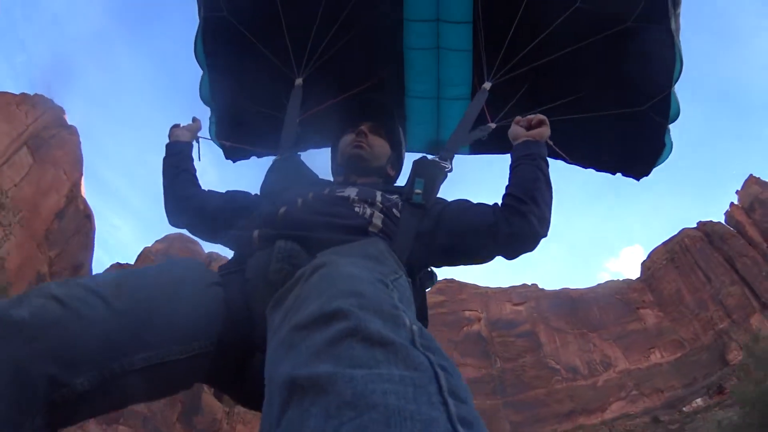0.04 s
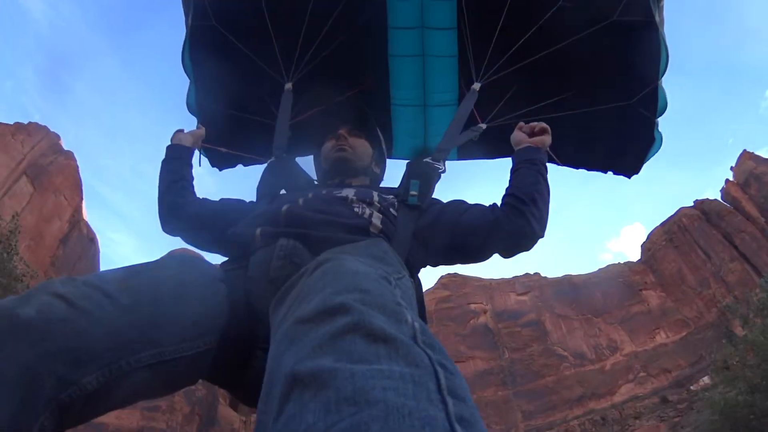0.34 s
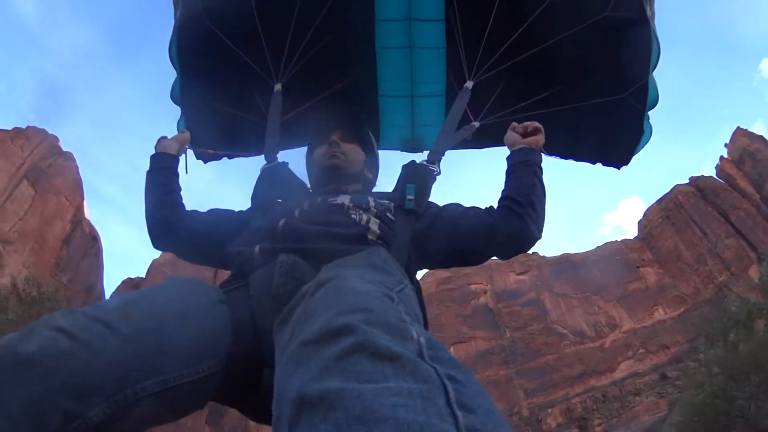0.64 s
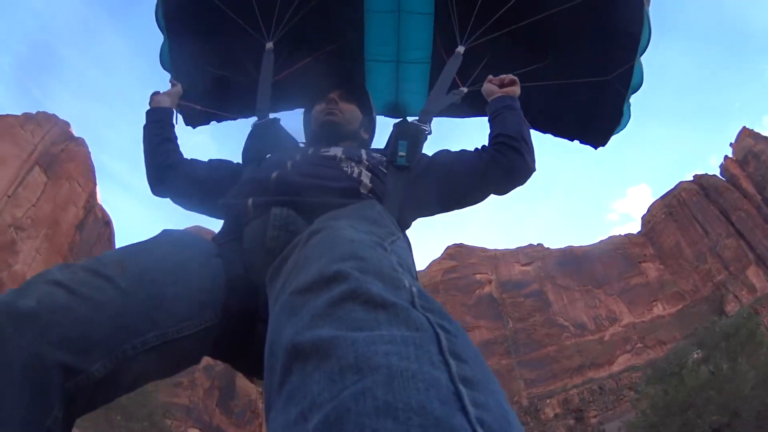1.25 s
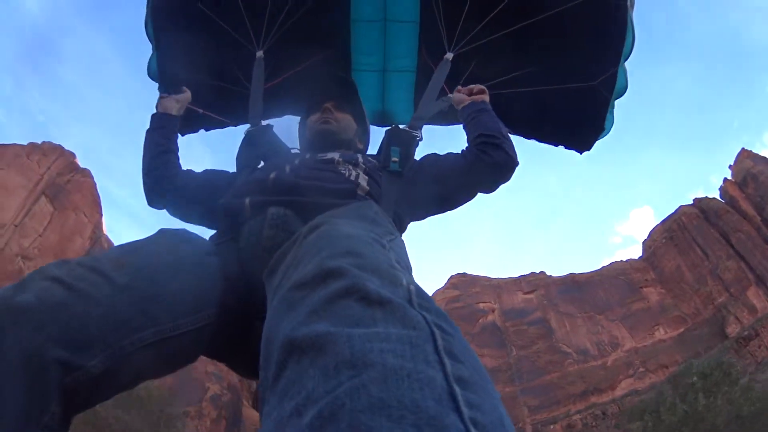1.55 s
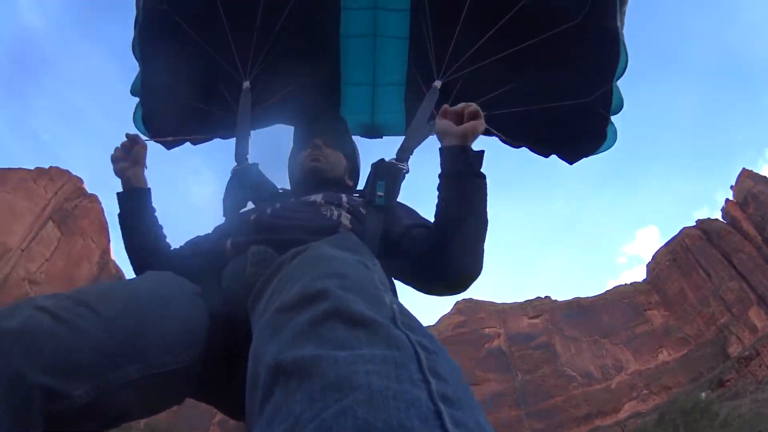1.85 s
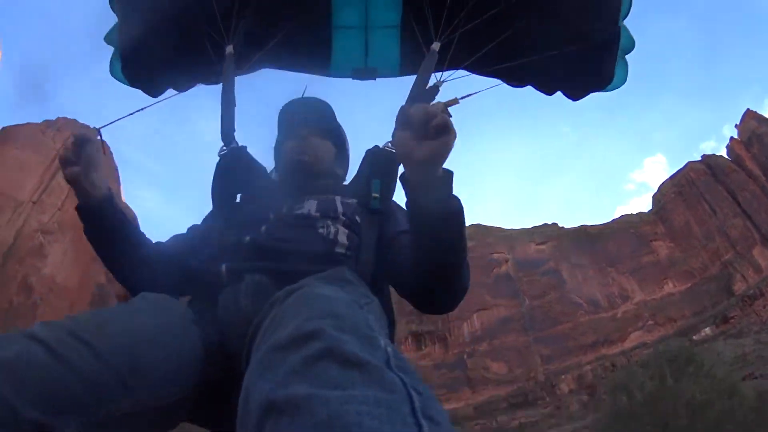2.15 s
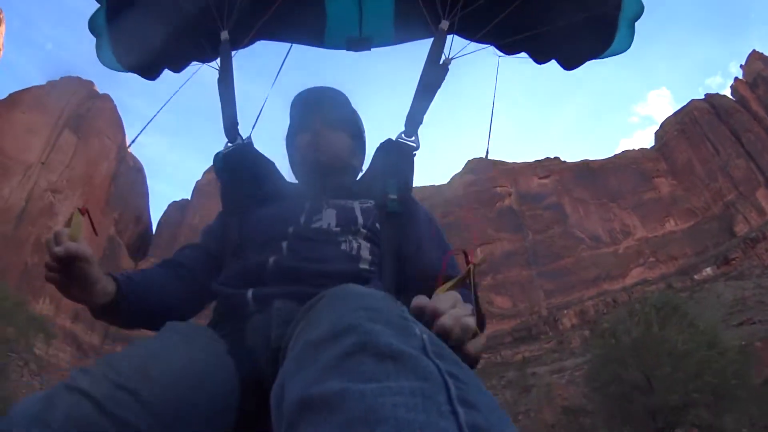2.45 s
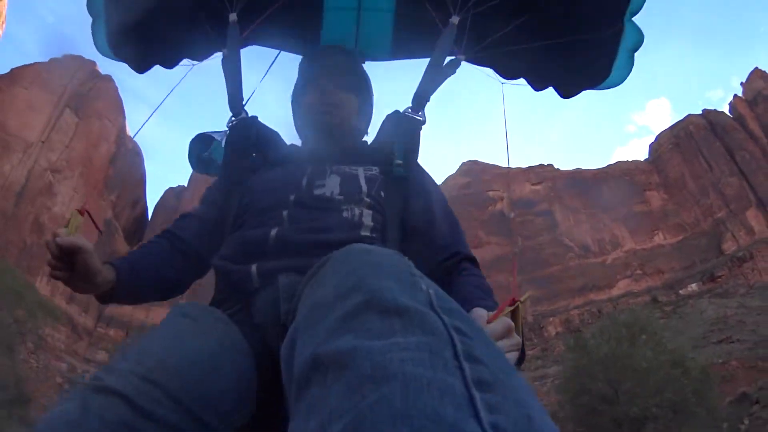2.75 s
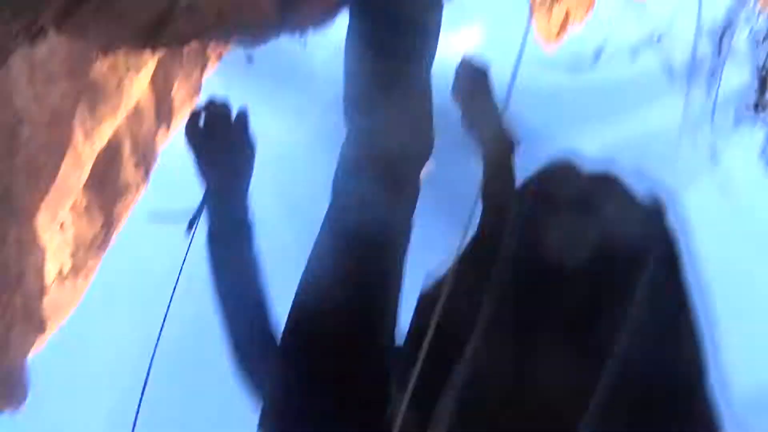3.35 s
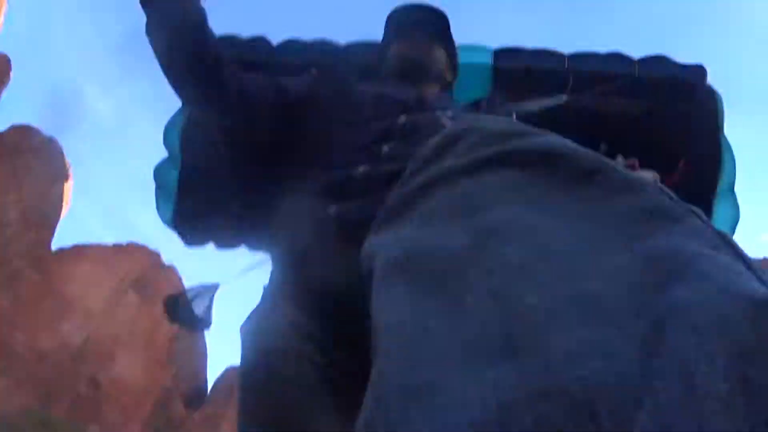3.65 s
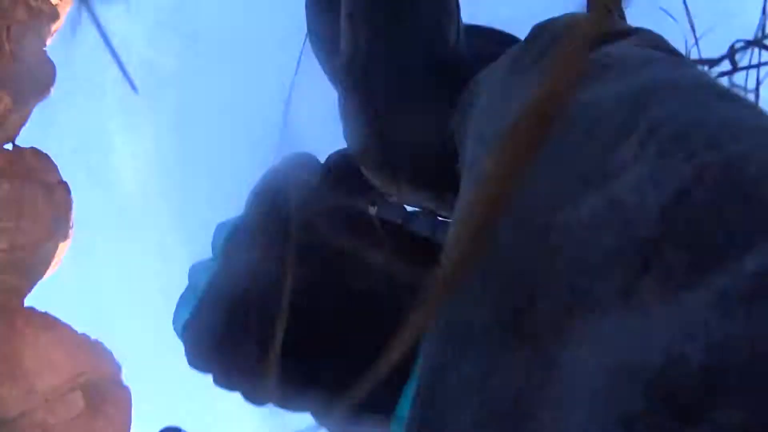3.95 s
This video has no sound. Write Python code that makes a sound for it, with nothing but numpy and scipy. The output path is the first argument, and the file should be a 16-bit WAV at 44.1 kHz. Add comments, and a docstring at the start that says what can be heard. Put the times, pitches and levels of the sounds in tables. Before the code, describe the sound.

Wind rumbles and buffets the microphone during a parachute glide, strongest at first and easing after about 1 second, with more gusts from 2 seconds. A thump comes near 2.7 seconds. From about 3 seconds the feet land with dull jolts, shoes scuff and tick in grit, and cloth rubs with brief squeaks as the wind drops. A cluster of hard knocks hits the microphone just before 4 seconds.

```python
"""Wind roars and buffets at the two microphone ports of a small camera on a parachutist's foot.
It eases as the canopy slows; harness cloth rustles and the lines sing faintly in the airflow.
Then the feet touch down: jolts thump, shoes scuff through grit, cloth rubs and squeaks on the
housing, and knocks rattle the camera and ring its shell."""
import sys
import numpy as np
from scipy import signal
from scipy.fft import rfft, irfft
from scipy.io import wavfile

SR = 44100
rng = np.random.default_rng(int(sys.argv[2]) if len(sys.argv) > 2 else 0)


def materialize(psi):
    """Save the field psi as 16-bit PCM at rate SR to the path in sys.argv[1].

    A 1-D psi becomes a single channel; in a 2-D psi each row is a channel.
    """
    bounded = np.clip(np.atleast_2d(psi).T, -1, 1)
    quanta = np.round(bounded * 32767).astype(np.int16)
    wavfile.write(sys.argv[1], SR, quanta)


N = 176400
T = np.arange(N) / SR
HZ = np.fft.rfftfreq(N, 1 / SR)

# turbulence (time [s], rumble [dB], buffet [dB], roar [dB]), before trim
EDDY_LEVELS = [(0.0, -40, -11.5, -19), (0.1, -22, -46, -14), (0.2, -33.5, -19, -19),
               (0.48, -24.5, -22.5, -16.5), (0.62, -36, -17.5, -18.5), (0.7, -29, -17.5, -20),
               (0.9, -33.5, -16, -20.5), (1.2, -28, -18, -23.0), (1.42, -29.5, -21.5, -26.5),
               (1.7, -31, -21, -28.5), (1.97, -25.5, -24.5, -26.5), (2.12, -39, -16.5, -19.5),
               (2.3, -26.5, -19.5, -26), (2.65, -25, -25, -28.5), (2.77, -28.5, -21.5, -20),
               (2.92, -20.5, -22.5, -21), (3.12, -25.5, -19.5, -21.5), (3.27, -18.5, -26, -21),
               (3.33, -38.5, -43, -60), (3.6, -41, -60, -30), (3.72, -42, -38, -32.5),
               (3.81, -48, -39, -44), (3.9, -23, -23, -41), (4, -42, -41.5, -54)]
# smoother flow (time [s], rush [dB], hiss [dB]), before trim
STREAM_LEVELS = [(0, -30, -53), (.14, -30, -51), (.34, -30.5, -58.5), (.47, -30, -55), (.63, -31, -50),
                 (.68, -37, -52), (.85, -34, -57.5), (1.05, -38, -60), (1.6, -39, -57), (2.5, -37.5, -53.5),
                 (2.68, -38.5, -55), (2.81, -40, -60), (2.97, -38.5, -49.5), (3.3, -29, -44.5),
                 (3.4, -35.5, -41.5), (3.58, -40, -54), (3.75, -40, -52.5), (3.8, -42, -57),
                 (3.95, -39, -55)]
# spectra (frequency [Hz], relative density [dB])
RUMBLE_SPECTRUM = [(15, -20.5), (35, -12), (70, -2.5), (110, -0.5), (160, -1.5), (300, -23.5), (1000, -51),
                   (3000, -76)]
BUFFET_SPECTRUM = [(50, -24), (110, -10), (165, 0), (210, 0.5), (280, -0.5), (370, -9), (600, -35),
                   (1500, -59.5), (4000, -82)]
ROAR_SPECTRUM = [(80, -24), (210, -14), (320, -3.5), (440, -3), (650, -8.5), (900, -14), (1300, -25.5),
                 (2500, -41), (8000, -86)]
RUSH_SPECTRUM = [(150, -7), (500, -2.5), (800, -2), (1150, 0), (1700, -8), (2500, -16.5), (4000, -28),
                 (5600, -31), (9000, -41)]
HISS_SPECTRUM = [(300, -6), (2000, 2.5), (3300, 3), (4700, 5), (5700, -3), (7300, 0), (9000, -1.5),
                 (10800, 2.5)]

def wind():
    """Large eddies rumble and buffet, small ones roar; smoother air adds a rush and a thin hiss."""
    rumble = airflow(RUMBLE_SPECTRUM, flutter_db=-2.5, flutter_hz=4.4)
    buffet = airflow(BUFFET_SPECTRUM, flutter_db=0.5, flutter_hz=24.8)
    roar = airflow(ROAR_SPECTRUM, flutter_db=1.7, flutter_hz=68)
    rush = airflow(RUSH_SPECTRUM, flutter_db=1.7, flutter_hz=140)
    hiss = airflow(HISS_SPECTRUM, flutter_db=1.5, flutter_hz=50)
    return (rumble * level(EDDY_LEVELS, column=1, trim_db=2.5)
            + buffet * level(EDDY_LEVELS, column=2, trim_db=-0.4)
            + roar * level(EDDY_LEVELS, column=3, trim_db=-1)
            + rush * level(STREAM_LEVELS, column=1, trim_db=0.5)
            + hiss * level(STREAM_LEVELS, column=2, trim_db=6))


# moving air (frequency [Hz], left-right correlation)
AIR_CORRELATION = [(60, 0.89), (130, 0.87), (270, 0.39), (570, -0.2), (1210, -0.37), (2570, 0.16),
                   (5450, 0.42), (11600, 0.64)]

def airflow(spectrum, flutter_db, flutter_hz):
    """Unit-rms turbulence that flutters as eddies pass the ports."""
    eddies = ports(colour(rng.standard_normal((2, N)), spectrum), AIR_CORRELATION)
    return unit(eddies * amp(flutter_db * wander(flutter_hz)))


# gusts at the ports (start [s], length [s], level [dB])
GUST_STROKES = [(.08, 0.036, -16), (.29, 0.05, -21), (.69, 0.051, -17.5), (.84, 0.099, -22),
                (2.03, 0.11, -20.5), (2.58, 0.014, -17), (2.715, 0.12, -17)]
# (frequency [Hz], relative density [dB])
GUST_SPECTRUM = [(60, -32), (160, -4.5), (270, 2.5), (380, -1.5), (520, -9), (700, -11), (1000, -32),
                 (3000, -71)]

def gusts():
    """Hollow swells of turbulence as the foot swings into the airflow."""
    swells = strokes(GUST_STROKES, rise_s=0.01, fall_s=0.019)
    return swells * airflow(GUST_SPECTRUM, flutter_db=2.0, flutter_hz=40)


# footfalls and jolts through the leg (time [s], level [dB], pitch [Hz])
JOLTS = [(2.7, -10.5, 85.5), (3.172, -9, 68.6), (3.195, -7.5, 64), (3.286, -8.5, 43), (3.421, -6, 86.5),
         (3.847, -9, 90), (3.872, -6.5, 129), (3.895, -12, 77), (3.922, -10, 121), (3.942, -13.5, 185)]

def thumps(rise_s=0.005, left_lag_s=0.001, puff_db=-9):
    """Each jolt pushes a damped low swing of air and a rough puff into one port, then the other."""
    out = np.zeros((2, N))
    samples = 6000
    t = np.maximum(T[:samples] - np.array([[left_lag_s], [0]]), 0)
    swell = (t / rise_s * np.exp(1 - t / rise_s)) ** 2.5
    rough_air = airflow(ROAR_SPECTRUM, flutter_db=5.5, flutter_hz=152)
    for k, (s, db, hz) in enumerate(JOLTS):
        puff = amp(puff_db) * np.roll(rough_air, k * samples, axis=1)[:, :samples]
        add(out, s, amp(db) * swell * (puff - np.sin(2 * np.pi * hz * t)))
    return out


# knocks on camera and strap (time [s], level [dB], pitch [Hz]); harder is higher
CAMERA_KNOCKS = [(3.128, -4.5, 900), (3.2065, -10.5, 1450), (3.2119, -8, 1700), (3.254, -18, 1600),
                 (3.473, -3, 1100), (3.542, -3, 1500), (3.702, -17.5, 1540), (3.8239, -17, 1380),
                 (3.8695, -15.5, 1700), (3.8797, 0.5, 1790), (3.8823, -4, 970), (3.8887, -0.5, 1140),
                 (3.9057, -6, 660)]
# (frequency [Hz], relative density [dB])
RATTLE_SPECTRUM = [(40, -21), (250, -2), (1100, 9), (2400, 6), (4000, -6), (7000, -14.5), (11000, -30)]

def knocks(decay_cycles=0.6, pitch_spread=0.15, rattle_db=-2.5, hard_hz=1500):
    """Knocks flex the camera mount for about a cycle; hard ones rattle it."""
    flex, rattle = np.zeros((2, 2, N))
    for s, db, hz in CAMERA_KNOCKS:
        cycles = hz * T[:2000] * np.exp(pitch_spread * rng.standard_normal((2, 1)))
        add(flex, s, amp(db) * np.sin(2 * np.pi * cycles) * np.exp(-cycles / decay_cycles))
        add(rattle, s, amp(db + rattle_db) * (hz / hard_hz) ** 2 * burst(decay_s=0.0022))
    return flex + colour(rattle, RATTLE_SPECTRUM)


# cloth on the housing (start [s], length [s], level [dB])
RUB_STROKES = [(3.095, 0.037, -16.5), (3.203, 0.069, -21.5), (3.302, 0.068, -28), (3.414, 0.026, -23.5),
               (3.44, 0.11, -18), (3.53, 0.046, -15), (3.575, 0.06, -15), (3.635, 0.037, -18),
               (3.697, 0.014, -35), (3.738, 0.015, -26), (3.772, 0.0075, -20)]
# (frequency [Hz], relative density [dB])
CLOTH_SPECTRUM = [(30, -7), (150, -2), (330, 2.5), (550, 0), (750, -1), (1200, -6), (1700, -16),
                  (3000, -30.5), (5000, -53), (11000, -71)]

def rubs():
    """Cloth sticks and slips on the housing with a dull rasp."""
    slips = grains(per_s=3700, spread_db=2.5) * unit(amp(1.54 * wander(rate_hz=46)))
    return colour(slips * strokes(RUB_STROKES, rise_s=0.0017, fall_s=0.0029), CLOTH_SPECTRUM)


# shoes and trouser legs in grit (start [s], length [s], level [dB])
SCUFF_STROKES = [(2.912, 0.0068, -30.5), (3.058, 0.015, -25), (3.112, 0.017, -30), (3.148, 0.033, -30.5),
                 (3.2, 0.007, -32), (3.246, 0.0095, -28), (3.301, 0.018, -19), (3.328, .038, -26.5),
                 (3.372, 0.075, -37), (3.44, 0.052, -22.5), (3.489, 0.024, -19), (3.516, 0.027, -25.5),
                 (3.735, 0.012, -36.5), (3.862, 0.083, -38)]
# (frequency [Hz], relative density [dB])
GRIT_SPECTRUM = [(60, -17), (400, 5.5), (1200, 6.5), (2200, 0.5), (3500, -4.5), (5500, -10), (7000, -6),
                 (8800, -9.5), (10500, -7)]

def scuffs():
    """Clumps of grit slip under the shoes."""
    slips = grains(per_s=3000, spread_db=4.8) * unit(amp(4.2 * wander(rate_hz=170)))
    return colour(slips * strokes(SCUFF_STROKES, rise_s=0.0026, fall_s=0.013), GRIT_SPECTRUM)


# small impacts (time [s], level [dB], leftward pan [dB])
GRIT_TICKS = [(2.378, -24, -5), (2.394, -16, -1), (2.436, -24, -7), (2.446, -19.5, 0), (2.879, -18, 17),
              (2.917, -22, 7), (3.052, -3.5, 8.5), (3.077, -11.5, 15), (3.092, -18, 9), (3.108, -12, -1),
              (3.17, -6.5, 3), (3.201, -10, -14), (3.221, -11, 0), (3.253, -12, 15), (3.302, -13, 5),
              (3.402, -17, 3), (3.462, -11, 2), (3.508, 1, -7), (3.526, -5, 0), (3.544, -1, 3),
              (3.7, -18, 0), (3.847, -14, 6), (3.9235, -8.5, -4)]
# (frequency [Hz], relative density [dB])
SNAP_SPECTRUM = [(200, -39), (1200, 7), (3300, 5), (5500, 2), (8000, 2.5), (10500, -1)]

def ticks():
    """Grit and buckles strike with sharp ticks."""
    out = np.zeros((2, N))
    for s, db, pan_db in GRIT_TICKS:
        add(out, s, amp([[db + pan_db / 2], [db - pan_db / 2]]) * burst(decay_s=0.00074))
    return colour(out, SNAP_SPECTRUM)


# cloth catching (start [s], length [s], level [dB], pitch [Hz])
SQUEAK_NOTES = [(3.327, 0.025, -30.5, 2100), (3.445, 0.046, -21, 1320), (3.543, 0.014, -16, 1180),
                (3.698, 0.011, -32, 1130), (3.74, 0.029, -27.5, 1010)]

def squeaks():
    """Slips almost in step make a short, rough note."""
    return tones(SQUEAK_NOTES, width_hz=540, rise_s=0.0017, fall_s=0.0029)


# harness and sleeves (start [s], length [s], level [dB])
RUSTLE_STROKES = [(1.135, 0.02, -49), (1.21, 0.02, -47), (1.4, 0.02, -46.5), (2.5, 0.065, -51),
                  (2.877, 0.024, -41), (3.942, .07, -38)]

def rustles():
    """Stiff fabric creases with a fine, bright crackle."""
    creases = grains(per_s=4000, spread_db=3.2)
    return colour(creases * strokes(RUSTLE_STROKES, rise_s=0.0026, fall_s=0.013), SNAP_SPECTRUM)


# suspension lines (start [s], length [s], level [dB], pitch [Hz])
LINE_NOTES = [(0, 0.47, -55, 4600), (1.92, .08, -61, 6750)]

def whistles():
    """Thin lines shed eddies at a high, fuzzy pitch."""
    return ports(tones(LINE_NOTES, width_hz=900, rise_s=0.027, fall_s=0.12), AIR_CORRELATION)


# shell resonances (frequency [Hz], level [dB], t60 [s])
SHELL_MODES = [(580, -51, 0.087), (1186, -56, 0.074), (2120, -53, 0.036), (3560, -60, 0.02),
               (6730, -40, 0.013), (9960, -26, .007), (10700, -31.5, 0.007)]
# contact sound (frequency [Hz], left-right correlation)
CONTACT_CORRELATION = [(60, 0.99), (250, 0.78), (600, -0.17), (1500, -0.14), (2500, 0.074), (4500, 0.41),
                       (10000, 0.36)]

def housing(contact):
    """Contact reaches both ports and rings the plastic shell."""
    direct = ports(contact, CONTACT_CORRELATION)
    t = T[:4000]
    ring = sum(amp(db - 60 * t / t60) * np.cos(2 * np.pi * hz * t) for hz, db, t60 in SHELL_MODES)
    return direct + signal.oaconvolve(direct, ring[None], axes=1)[:, :N]


def ports(x, correlation):
    """Two close ports: each channel leaks into the other."""
    angle = np.arcsin(np.clip(per_bin(correlation), -.99, .99)) / 2
    bins = rfft(x)
    return irfft(np.cos(angle) * bins + np.sin(angle) * bins[::-1], N)


def tones(table, width_hz, rise_s, fall_s):
    """Breathy notes: noise in a narrow resonance."""
    out = np.zeros((2, N))
    for s, length, db, hz in table:
        rolloff = (1 + (2 * (HZ - hz) / width_hz) ** 2) ** 2
        note = irfft(rfft(rng.standard_normal((2, N))) / rolloff, N)
        out += unit(note) * strokes([(s, length, db)], rise_s, fall_s)
    return out


def grains(per_s, spread_db):
    """Tiny random slips of unequal size at each port."""
    size = amp(spread_db * np.minimum(rng.exponential(1, (2, N)), 4))
    sign = rng.choice([-1, 1], (2, N))
    slipping = rng.random((2, N)) < per_s / SR
    return unit(size * sign * slipping)


def strokes(table, rise_s, fall_s):
    """Rise-hold-release envelopes, summed in power."""
    power = np.zeros(N)
    for s, length, db in table:
        rise = np.clip((T - s) / rise_s, 0, 1)
        release = np.exp(-np.maximum(T - s - length, 0) / fall_s)
        power += (amp(db) * rise * release) ** 2
    return np.sqrt(power)


def burst(decay_s, rise_s=0.00073):
    """Brief contact noise at each port."""
    t = T[:2000]
    return rng.standard_normal((2, len(t))) * np.minimum(t / rise_s, 1) * np.exp(-t / decay_s) / 2


def wander(rate_hz):
    """Unit-rms drift from 1 Hz to about rate_hz."""
    return unit(irfft(rfft(rng.standard_normal(N)) * (HZ > 1) / (1 + (HZ / rate_hz) ** 4), N))


def colour(x, spectrum):
    """Minimum-phase filter of unit energy."""
    cepstrum = irfft(np.log(amp(per_bin(spectrum))), N)
    cepstrum[1:N // 2] *= 2
    cepstrum[N // 2 + 1:] = 0
    response = np.exp(rfft(cepstrum))
    return irfft(rfft(x) * response / np.sqrt(np.mean(abs(response) ** 2)), N)


def per_bin(points):
    """Table interpolated over log frequency."""
    hz, value = np.transpose(points)
    return np.interp(np.log(HZ + 1), np.log(hz + 1), value)


def level(table, column, trim_db):
    """Gain over time from one dB column."""
    rows = np.array(table)
    return amp(np.interp(T, rows[:, 0], rows[:, column]) + trim_db)


def add(mix, start_s, sound):
    """Mixes in a stereo sound."""
    part = mix[:, round(start_s * SR):][:, :sound.shape[1]]
    part += sound[:, :part.shape[1]]


def amp(db):
    """Decibels to gain."""
    return 10 ** (np.asarray(db) / 20)


def unit(x):
    """Scales to unit rms."""
    return x / np.sqrt(np.mean(x ** 2) + 1e-20)


def scene():
    """Wind, and the landing heard through the camera body."""
    contact = scuffs() + rustles() + rubs() + squeaks() + knocks() + ticks()
    return wind() + gusts() + whistles() + thumps() + housing(contact)


def record(dry, cutoff_hz=11080):
    """Overload clips at full scale; a low-pass follows."""
    lowpass = signal.firwin(301, cutoff_hz, window=("kaiser", 8), fs=SR)
    return signal.oaconvolve(np.clip(dry, -1, 1), lowpass[None], "same")


dry = scene()
out = record(dry)
materialize(out)
```